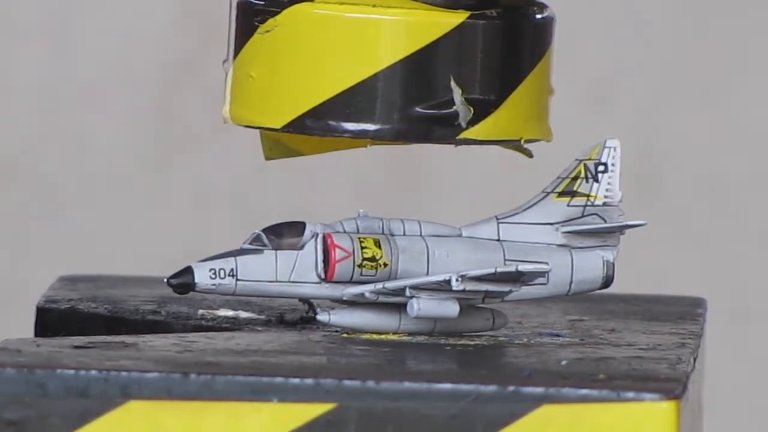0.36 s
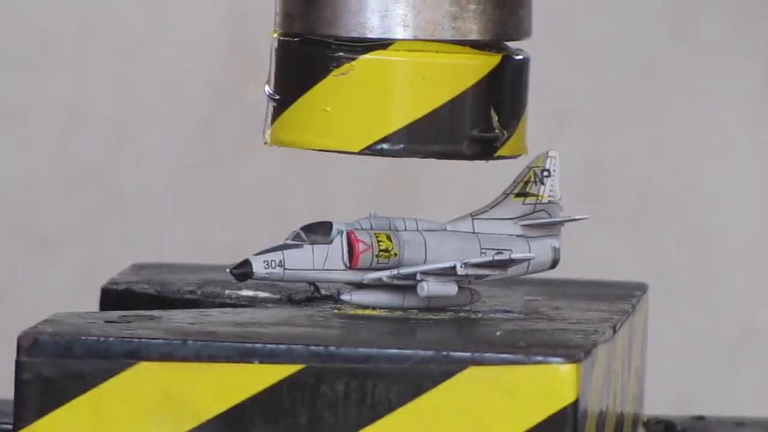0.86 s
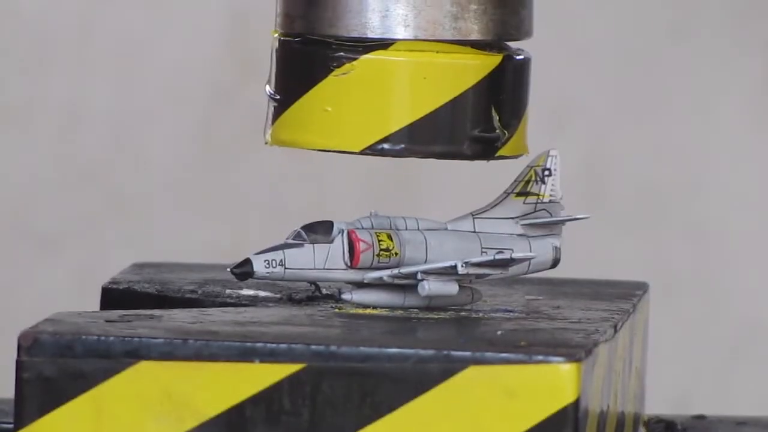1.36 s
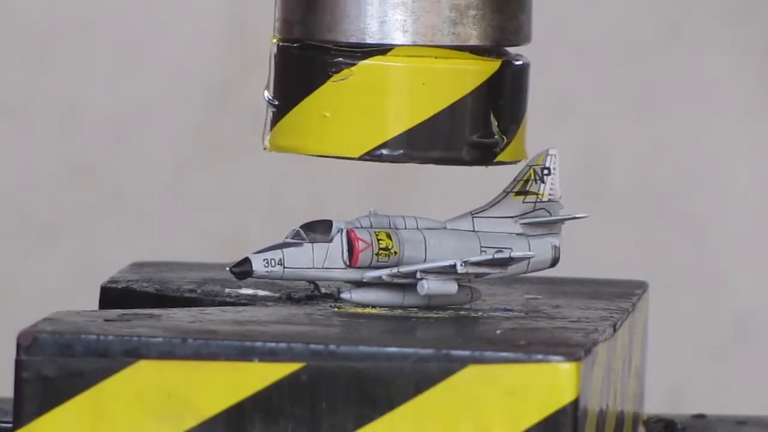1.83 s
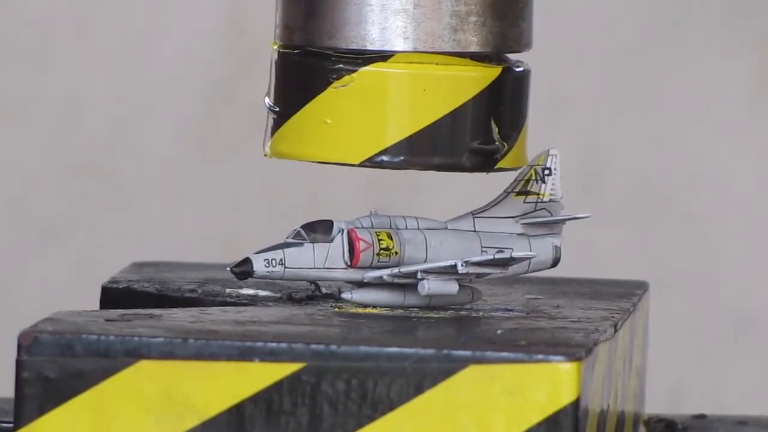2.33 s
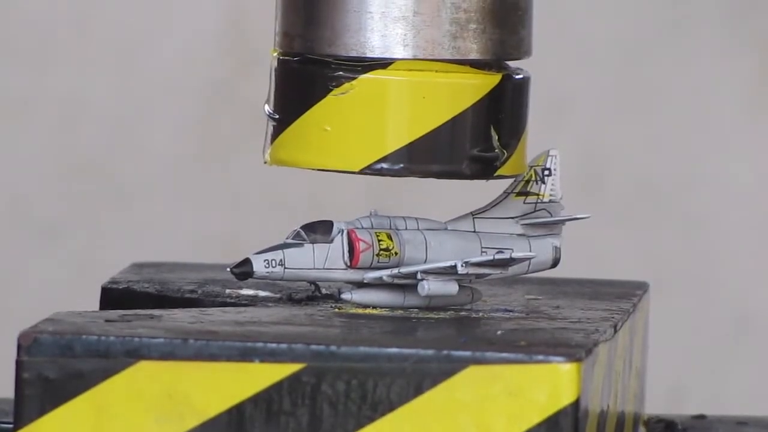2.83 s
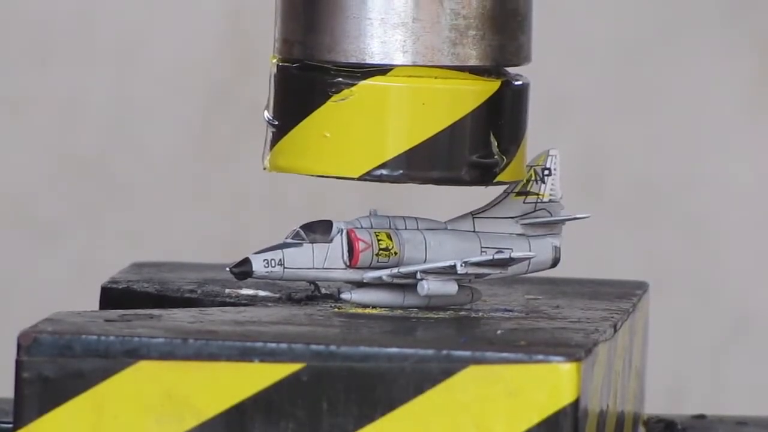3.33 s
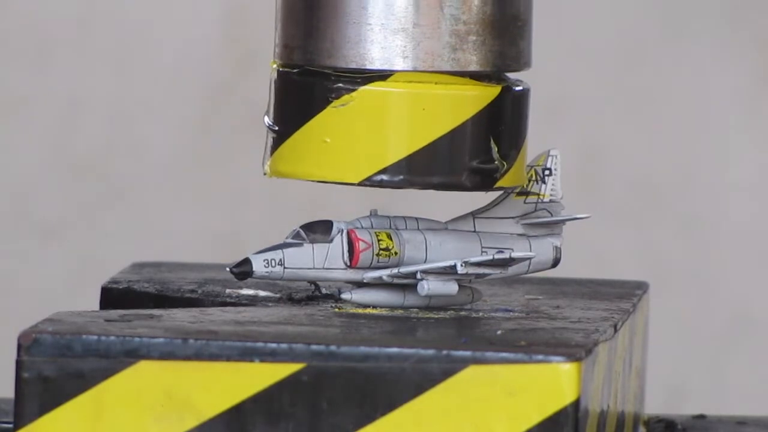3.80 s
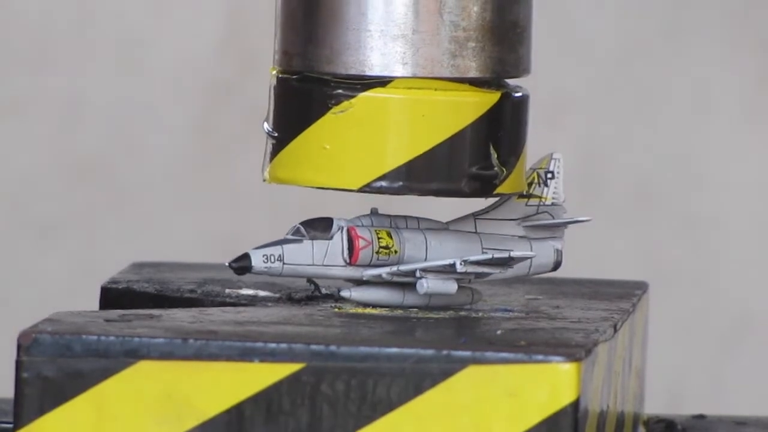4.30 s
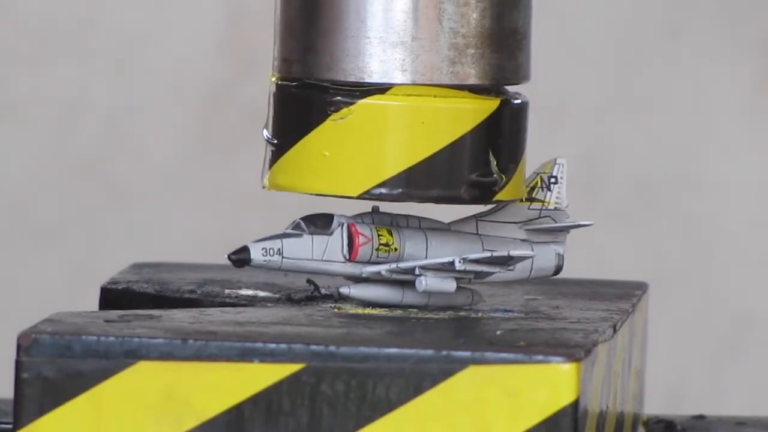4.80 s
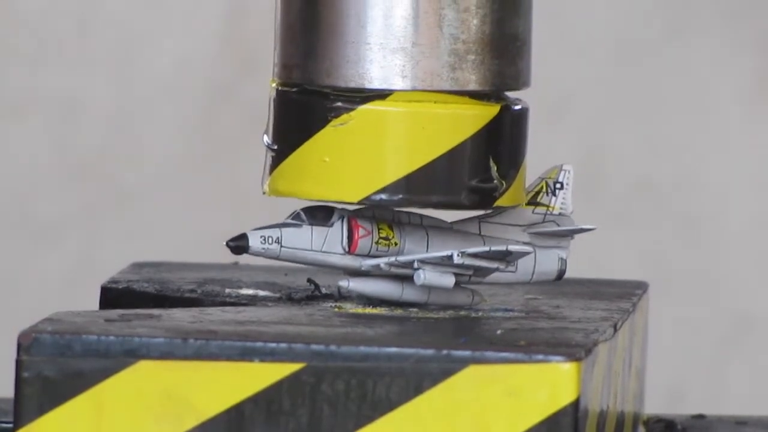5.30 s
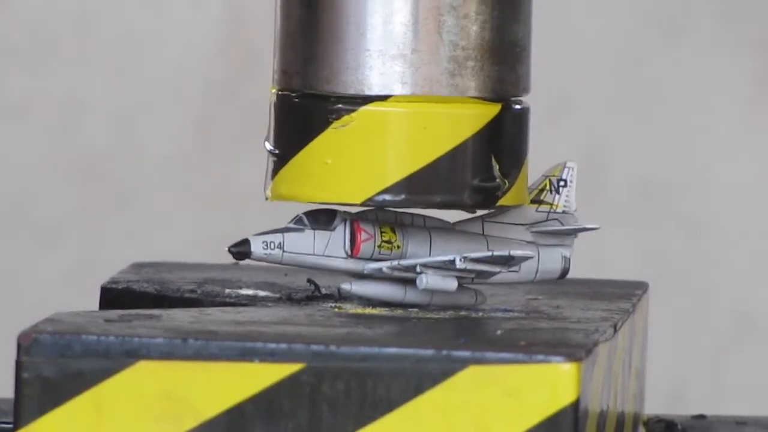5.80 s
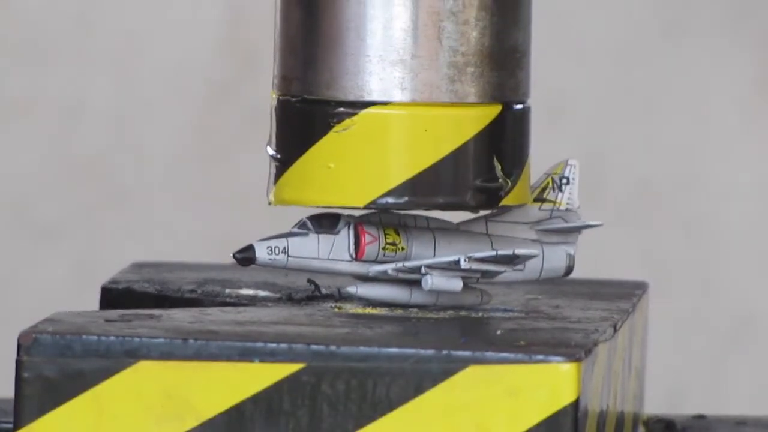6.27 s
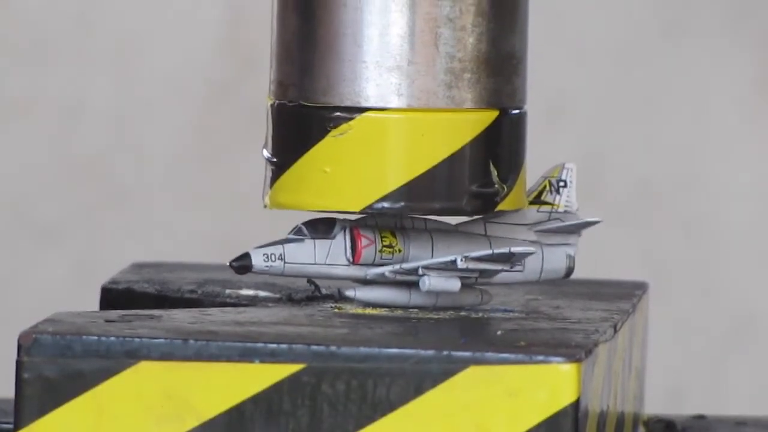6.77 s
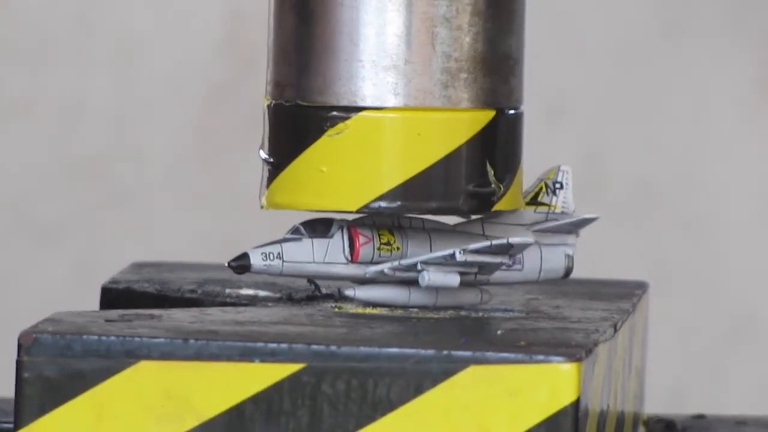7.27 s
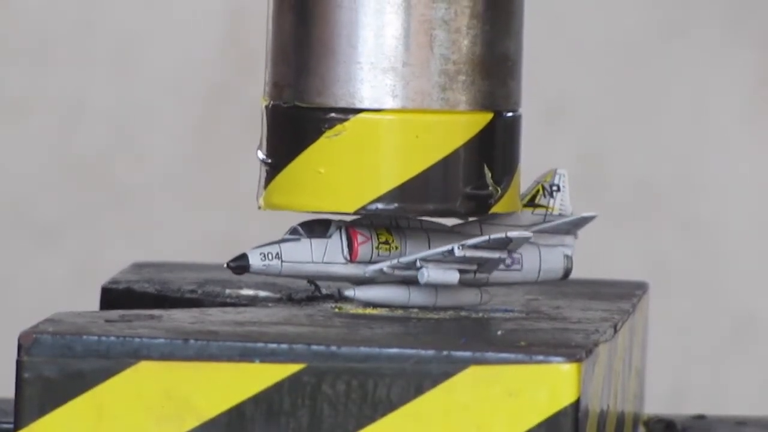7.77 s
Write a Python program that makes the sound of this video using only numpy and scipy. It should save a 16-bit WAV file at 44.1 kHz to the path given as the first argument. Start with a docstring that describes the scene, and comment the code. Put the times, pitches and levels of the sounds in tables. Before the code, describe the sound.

Ringing air hiss swells and stops dead, then after a short quiet a hydraulic press pump chugs in rapid puffs, joined by a low compressor hum.

```python
"""A small workshop, a two-port microphone near a press. Air bleeds through a short pipe as ringing hiss, and
then all of it stops at once. After a quiet moment a valve opens and an air-driven hydraulic pump strokes about
twelve times a second: each stroke is a thump of room modes, an exhaust puff of shaped noise and a piston knock
that rings the body. Later the piston compressor that feeds it starts up and takes load: multiples of its turn,
and valve clatter. Small ticks, faint tones and quiet shop noise lie around them."""
import sys
import numpy as np
from scipy import signal
from scipy.fft import rfft, irfft
from scipy.io import wavfile
from scipy.ndimage import uniform_filter1d

SR = 44100
rng = np.random.default_rng(int(sys.argv[2]) if len(sys.argv) > 2 else 0)


def materialize(psi):
    """Save the field psi as 16-bit PCM at rate SR to the path in sys.argv[1].

    A 1-D psi becomes a single channel; in a 2-D psi each row is a channel.
    """
    bounded = np.clip(np.atleast_2d(psi).T, -1, 1)
    quanta = np.round(bounded * 32767).astype(np.int16)
    wavfile.write(sys.argv[1], SR, quanta)


def voltage_ratio(level):
    """Linear amplitude factor for a level in decibels (scalar or array-like)."""
    return 10 ** (np.asarray(level, float) / 20)


N = 347508
T = np.arange(N) / SR
HZ = np.arange(N // 2 + 1) * SR / N + 1e-3  # just above zero, so that its logarithm exists


def read(table, at):
    """Straight lines between the rows; one array per column after the first."""
    x, *columns = np.transpose(table)
    return [np.interp(at, x, column) for column in columns]


def per_hz(table):
    """A pitch table read at every frequency, joined on a log axis."""
    table_hz, value = np.transpose(table)
    return np.interp(np.log(HZ), np.log(table_hz), value)


def unit(x):
    """Scale a sound to an rms of one."""
    return x / np.sqrt(np.mean(x ** 2))


def colour(spectrum, peaks=()):
    """Gain of a smooth spectrum with resonances standing on it."""
    lift = 0
    for hz, width, db in peaks:
        lift = lift + (voltage_ratio(db) ** 2 - 1) / (1 + (2 * (HZ - hz) / width) ** 2)
    return voltage_ratio(per_hz(spectrum)) * np.sqrt(np.maximum(1 + lift, .01))


# How alike left and right are in sound that comes from all around.
# Columns: pitch_hz, likeness (0 unrelated, 1 the same)
PORT_LIKENESS = [(30, .996), (100, 0.99), (300, 0.98), (1000, 0.91), (3000, 0.39), (8000, 0.04),
                 (15000, 0.038)]


def spread(spectra):
    """Two unrelated sounds become left and right, alike in the bass as at two close ports."""
    alike = np.clip(per_hz(PORT_LIKENESS), 0, 1)
    mid = spectra[0] * np.sqrt(1 + alike)
    side = spectra[1] * np.sqrt(1 - alike)
    return irfft(np.array([mid + side, mid - side]), N) / np.sqrt(2)


def diffuse(gain):
    """Stereo noise of a given colour, coming from all around."""
    return unit(spread(rfft(rng.standard_normal((2, N))) * gain))


def walk(rate):
    """Random levels held 1 / rate seconds and smoothed twice; spread near 1."""
    hold = int(SR / rate)
    steps = np.repeat(rng.standard_normal(N // hold + 1), hold)
    return 1.2 * uniform_filter1d(uniform_filter1d(steps, hold), hold)[:N]


def ring(times, sizes, modes):
    """Every blow sets off decaying sine waves, one per mode (pitch, level, 60 dB decay time)."""
    out = np.zeros(N)
    at = (np.asarray(times) * SR).astype(int)
    for hz, db, t60 in modes:
        blows = np.zeros(N)
        blows[at] = sizes * voltage_ratio(db)
        pole = np.exp(2j * np.pi * hz / SR - np.log(1000) / (t60 * SR))
        out += signal.lfilter([1], [1, -pole], blows).imag
    return out


def bursts(events, low_hz, high_hz, decay_s, tail):
    """Band noise that jumps up at each event and dies, with a fainter, longer tail."""
    size = 0
    for s, db in events:
        age = np.maximum(T - s, 0) / decay_s
        size = size + voltage_ratio(db) * (T >= s) * (np.exp(-age) + tail * np.exp(-age / 12))
    band = signal.butter(1, [low_hz, high_hz], "bandpass", fs=SR, output="sos")
    return size * unit(signal.sosfilt(band, rng.standard_normal(N)))


def placed(x):
    """Direct sound from the right reaches the left port late; a diffuse tail loses its treble first."""
    room_t60_s, treble_t60_s, room_db, left_lag_s = 0.6, 0.028, -9, 2.4e-5
    noise = rng.standard_normal((2, N)) * (T > .004)
    low = signal.sosfilt(signal.butter(1, 3000, fs=SR, output="sos"), noise)
    tail = low * np.exp(-np.log(1000) * T / room_t60_s)
    tail += (noise - low) * np.exp(-np.log(1000) * T / treble_t60_s)
    tail /= np.sqrt(np.sum(tail ** 2, axis=1, keepdims=True))
    sound = rfft(x)
    left = irfft(sound * np.exp(-2j * np.pi * HZ * left_lag_s), N)
    return np.array([left, x]) + voltage_ratio(room_db) * spread(sound * rfft(tail))


# Air supply, heard as the strength of the puffs.
# Columns: time_s, strength_db
AIR_SUPPLY = [(1.31, -40.5), (1.45, -42.5), (2.3, -43), (2.7, -42), (3.6, -43.5), (4.05, -43),
              (4.33, -45.5), (4.72, -43), (5.25, -45), (5.8, -44), (6.6, -44.5), (7.88, -44.5)]


def strokes():
    """The pump starts slowly, gathers speed, then is held back a little as oil pressure builds."""
    count, first_s, stroke_s = 78, 1.314, .07511
    start_drag_s, start_strokes = .02463, .8333  # extra length, fading over so many strokes
    warm_drag_s, warm_strokes = .01895, 24.39  # the same for the slow run-up
    load_drag_s = 7.587e-5  # added by every stroke
    jitter_s, scatter_db = .0007, .35
    n = np.arange(count)
    length = stroke_s + load_drag_s * n
    length += start_drag_s * np.exp(-n / start_strokes)
    length += warm_drag_s * np.exp(-n / warm_strokes)
    chance = rng.standard_normal((2, count)) * (n > 0)
    s = first_s + np.cumsum(length) - length + jitter_s * chance[0]
    return s, read(AIR_SUPPLY, s)[0] + scatter_db * chance[1]


def puff(share):
    """The port opens, stays open, then the cylinder empties: a steady fall in dB after a soft knee."""
    attack, hold, knee = 0.038, 0.39, 0.045  # shares of a stroke
    fall_db = -28  # over a whole stroke
    late = knee * np.logaddexp(0, (share - hold) / knee)
    return (1 - np.exp(-share / attack)) * voltage_ratio(fall_db * late)


def exhaust_flow(s, db):
    """Strength of the puffs, each stretched to its stroke."""
    port_lead_s = .0025  # the port cracks open just ahead of the stroke
    ends = np.append(s, 2 * s[-1] - s[-2]) - port_lead_s
    stroke = np.interp(T, ends, np.arange(len(ends)))
    index = np.minimum(stroke.astype(int), len(s) - 1)
    share = stroke - index
    # the last puff is still dying while the next one opens
    both = np.hypot(puff(share), (index > 0) * puff(share + 1))
    return voltage_ratio(db[index]) * both * (T >= ends[0])


def valve_inrush(first_s):
    """Air rushes in until the first stroke: the valve cracks open fast, then the flow keeps growing."""
    valve_s, attack_s, start_db, growth_db_per_s = 1.249, 0.016, -68.5, 222
    opened = np.clip(T - valve_s, 0, 1)
    rise = 1 - np.exp(-(opened / attack_s) ** 2)
    return voltage_ratio(start_db + growth_db_per_s * opened) * rise * (T < first_s)


# Colour of the exhaust noise.
# Columns: pitch_hz, relative_db (per Hz)
EXHAUST_COLOUR = [(88, -61), (150, -53), (334, -19.5), (544, -16), (758, -10), (868, -16), (1100, -10.5),
                  (1500, -13.5), (1650, -8), (2640, -3), (9390, 0.5), (13300, -3), (15900, -6.5)]
# Resonances of the muffler.
# Columns: pitch_hz, width_hz, lift_db
MUFFLER_PEAKS = [(772, 16, 4), (1384, 14, 6), (1620, 120, 1), (2333, 45, 4), (2598, 35, 4), (2908, 40, 3),
                 (4419, 45, 3.5), (4992, 50, 3.5), (6440, 150, 2.5), (8004, 45, 3), (8926, 45, 4),
                 (9221, 50, 3.5)]


def exhaust(s, db):
    """Air flow makes muffled noise: a direct jet, and noise scattered by nearby steel."""
    scatter_db, scatter_s = 0.5, .006
    flow = exhaust_flow(s, db) + valve_inrush(s[0])
    gain = colour(EXHAUST_COLOUR, MUFFLER_PEAKS)
    jet = unit(irfft(rfft(rng.standard_normal(N)) * gain, N)) * voltage_ratio(0.64 * walk(150))
    # the scattered noise follows the flow with a short lag
    lag = np.exp(-1 / (scatter_s * SR))
    scatter = voltage_ratio(scatter_db) * diffuse(gain) * signal.lfilter([1 - lag], [1, -lag], flow)
    return jet * flow, scatter


# Ringing modes of the pump body.
# Columns: pitch_hz, relative_db, decay_60db_s
PUMP_BODY = [(330, -15, .05), (600, -14, .05), (776, -12, .12), (1130, -11, .06), (1385, -12, .08),
             (1620, -3, .07), (1950, -8, .04), (2450, -3, .06)]


def piston_knocks(s):
    """The piston strikes once a stroke and rings the pump body."""
    lag_s, jitter_s, level_db, scatter_db = .022, 0.001505, -57, 2
    chance = rng.standard_normal((2, len(s)))
    return ring(s + lag_s + jitter_s * chance[0], voltage_ratio(level_db + scatter_db * chance[1]), PUMP_BODY)


# Other, loose blows on the pump body.
# Columns: time_s, strength_db
LOOSE_BLOWS = [(1.266, -70), (1.281, -65), (1.2885, -63), (1.3148, -44), (1.326, -45), (1.338, -53)]


def loose_blows():
    """A loose blow rings the body and cracks broadly; its dull, dry part comes through the frame."""
    ring_db, crack_db, crack_s = -4, 7, .004
    blow_s, blow_db = np.transpose(LOOSE_BLOWS)
    sharp = ring(blow_s, voltage_ratio(blow_db + ring_db), PUMP_BODY)
    sharp += voltage_ratio(crack_db) * bursts(LOOSE_BLOWS, 1700, 3300, crack_s, 0)
    dull = bursts(LOOSE_BLOWS, 150, 1000, crack_s, 0)
    return sharp, dull


# Balance of the pump between the two ports.
# Columns: pitch_hz, left_minus_right_db
PUMP_BALANCE = [(300, 0.5), (2000, -1.6), (9000, -1.3), (14000, -3)]


def pump(s, db):
    """Puffs, knocks and blows sound in the room; scattered noise and the dull blows stay outside its tail."""
    jet, scatter = exhaust(s, db)
    sharp, dull = loose_blows()
    both = placed(jet + piston_knocks(s) + sharp) + scatter + dull
    half = np.array([[.5], [-.5]])  # half of the difference goes to each port
    return irfft(rfft(both) * voltage_ratio(per_hz(PUMP_BALANCE) * half), N)


# Low room modes that take the pressure step.
# Columns: pitch_hz, level_db, decay_60db_s, lead_on_puff_s
ROOM_MODES = [(49, -66, .17, -.0015), (99, -75, .3, .0045), (105, -65, .04, .005)]


def thumps(s, db):
    """The pressure dips just before each puff and the lowest room modes swing after it."""
    blow_thump_db = 54  # how far a loose blow shakes the room modes
    blow_s, blow_db = np.transpose(LOOSE_BLOWS)
    times = np.append(s, blow_s + 0.0026)
    size = voltage_ratio(np.append(db - db.mean(), blow_db + blow_thump_db))
    out = np.zeros(N)
    for *mode, lead in ROOM_MODES:
        # modes set off ahead of the puff swing down first, those set off by it swing up
        out -= np.sign(lead) * ring(times - lead, size, [mode])
    return out


# How the compressor starts up and takes load.
# Columns: time_s, turns_hz, level_db, load (0 to 1)
COMPRESSOR_RUN = [(3.72, 23.2, -90, 0.01), (3.73, 24.2, -61, 0.05), (3.97, 24.2, -59.5, .25),
                  (4.15, 23.9, -60, .65), (4.4, 23.87, -59.5, .97), (7.88, 23.87, -59.5, 1)]
# Tones of the compressor under load.
# Columns: multiple_of_turn, relative_db
TURN_MULTIPLES = [(1, -10), (2, -6), (3, -4), (4, 0), (5, -1), (6, -13), (7, -10), (8, -10), (9, -14),
                  (10, -8), (11, -5), (12, -9), (13, -10), (14, -11), (15, -9), (16, -11), (17, -8),
                  (18, -15), (19, -17), (20, -8), (21, -10), (22, -6), (23, -4), (24, -11), (25, -13),
                  (26, -6), (27, -13), (28, -1), (29, -7), (30, -10), (31, -9), (32, -8), (33, -7),
                  (34, -9), (35, -13), (36, -11), (37, -10), (38, -4), (39, -4), (40, -2), (41, -12),
                  (42, -9), (43, -12), (44, -11), (45, -14), (46, -15), (47, -9), (48, -10), (49, -11),
                  (50, -13)]


def compressor_tones(turn, load, running):
    """Multiples of the turn that wander a little; without load they thin out around a hum."""
    idle_tilt_db, idle_hum_db = -3.5, 7  # fall per octave away from the fourth multiple; lift of that one
    wander_db = 1.1  # each tone's change from turn to turn
    smear_rad, smear_rad_per_multiple = .8, .025  # the room knocks them out of step, high ones more
    turn, load = turn[running], load[running]
    tones, turns = np.zeros((2, N)), np.arange(128)
    for k, tone_db in TURN_MULTIPLES:
        side, start, *wander = rng.standard_normal(len(turns) + 2)
        idle_db = (1 - load) * (idle_tilt_db * abs(np.log2(k / 4)) + idle_hum_db * (k == 4))
        gain = voltage_ratio(tone_db + idle_db + wander_db * np.interp(turn, turns, wander))
        phase = (smear_rad + smear_rad_per_multiple * k) * start
        # the two ports hear the higher multiples a little out of step
        port_phase = 0.0091 * k * side * np.array([[1], [-1]])
        tones[:, running] += gain * np.cos(2 * np.pi * k * turn + phase + port_phase)
    size = np.sqrt(np.sum(voltage_ratio(np.array(TURN_MULTIPLES)[:, 1]) ** 2) / 2)
    return tones / size


# Colour of the valve noise.
# Columns: pitch_hz, relative_db (per Hz)
CLATTER_COLOUR = [(18, -35), (30, -29), (104, -10), (439, 9), (672, 5), (1310, 6), (2500, 7), (3250, -53),
                  (5500, -120)]


def valve_clatter(turn, load):
    """Valve noise jumps up once a turn and dies away, fainter without load."""
    idle_share = 0.38
    beat = .5 + np.exp(-(turn % 1) / 0.42)
    return diffuse(colour(CLATTER_COLOUR)) * beat * (idle_share + (1 - idle_share) * load)


def compressor():
    """One turning shaft drives both the tones and the valve clatter."""
    pulse_s = 5.628  # one of the compression pulses, which come once a turn
    clatter_db = -4  # beside the tones
    hz, db, load = read(COMPRESSOR_RUN, T)
    running = T > COMPRESSOR_RUN[0][0]
    turn = np.cumsum(hz * running) / SR
    turn += -turn[int(pulse_s * SR)] % 1
    tones = compressor_tones(turn, load, running)
    return running * voltage_ratio(db) * (tones + voltage_ratio(clatter_db) * valve_clatter(turn, load))


# Strength of the bleeding air.
# Columns: time_s, hiss_db, rumble_db
BLEED_LEVELS = [(0, -57.5, -54.5), (.15, -55, -57), (.2, -54, -57.5), (.45, -51.5, -57),
                (.55, -50.5, -55.5), (.72, -48, -54)]
# Colour of its hiss, below the pipe resonances.
# Columns: pitch_hz, relative_db (per Hz)
HISS_COLOUR = [(200, -41), (400, -9), (800, -13), (1400, -14), (2500, -19.5), (4500, -23.5), (7000, -20.5),
               (10000, -18), (16000, -27)]
# Resonances of the short pipe.
# Columns: pitch_hz, width_hz, lift_db
PIPE_PEAKS = [(503, 30, 7.5), (631, 14, 11.5), (959, 39, 22), (1914, 110, 15.5), (2885, 134, 17),
              (2960, 60, 17.5), (3860, 130, 14.5), (4700, 330, 12.5), (5870, 200, 16), (8240, 530, 7.5)]
# Colour of the rumble, below its resonances.
# Columns: pitch_hz, relative_db (per Hz)
RUMBLE_COLOUR = [(20, -31), (40, -8), (100, -5), (230, -9.5), (350, -15), (600, -45)]
# Resonances of the rumble.
# Columns: pitch_hz, width_hz, lift_db
RUMBLE_RESONANCES = [(55.5, 18, 12), (140, 15, 9.5), (218, 26, 6.5)]


def bleed():
    """Rushing air excites the near-harmonic resonances of a short pipe over a rumble; at 0.72 s hiss and rumble
    stop at once."""
    stop_s = .7235
    hiss_db, rumble_db = read(BLEED_LEVELS, T)
    hiss = diffuse(colour(HISS_COLOUR, PIPE_PEAKS)) * voltage_ratio(hiss_db + .7 * walk(40))
    rumble = diffuse(colour(RUMBLE_COLOUR, RUMBLE_RESONANCES)) * voltage_ratio(rumble_db)
    return (hiss + rumble) * (T < stop_s)


# Small dry ticks.
# Columns: time_s, strength_db
DRY_TICKS = [(.205, -50), (.9093, -68.5), (.9135, -70.5)]


def ticks():
    """Short bursts of band noise with a faint tail."""
    return bursts(DRY_TICKS, 1500, 4900, 0.0018, 0.32)


# Faint far tones.
# Columns: start_s, length_s, start_pitch_hz, end_pitch_hz, peak_db
FAR_TONES = [(.97, .09, 5850, 5700, -90), (1.1, .035, 6500, 6050, -88), (2.4, 1.9, 201, 201.5, -78)]


def faint_tones():
    """Thin sine waves that glide in pitch while they swell and fade."""
    out = np.zeros(N)
    for s, length, from_hz, to_hz, db in FAR_TONES:
        share = np.clip((T - s) / length, 0, 1)
        pitch = from_hz + (to_hz - from_hz) * share
        out += voltage_ratio(db) * np.sin(np.pi * share) * np.sin(2 * np.pi * np.cumsum(pitch) / SR)
    return out


# Colour of the quiet workshop.
# Columns: pitch_hz, relative_db (per Hz)
SHOP_COLOUR = [(15, -43), (25, 2.5), (107, -3.5), (145, -7), (166, -8), (200, -8.5), (292, -8.5),
               (622, -15.5), (1330, -16), (4350, -27.5), (15900, -38)]


def workshop():
    """Quiet noise from all around, its level wavering a little."""
    level_db = -74 + 0.56 * walk(24)
    return voltage_ratio(level_db) * diffuse(colour(SHOP_COLOUR))


def scene():
    """All sources over the quiet workshop."""
    s, db = strokes()
    machines = pump(s, db) + thumps(s, db) + compressor()
    return machines + bleed() + ticks() + faint_tones() + workshop()


def band_limit(x):
    """A steep low-pass at the top of the band."""
    return signal.sosfilt(signal.butter(12, 16050, fs=SR, output="sos"), x)


def record(dry):
    """The recorder cuts the top of the treble with a steep filter."""
    top_cut = signal.ellip(12, .2, 70, 15740, fs=SR, output="sos")  # order, ripple dB, stop dB, edge Hz
    mix = signal.sosfilt(top_cut, dry)
    return band_limit(mix)


dry = scene()
out = record(dry)
materialize(out)
```